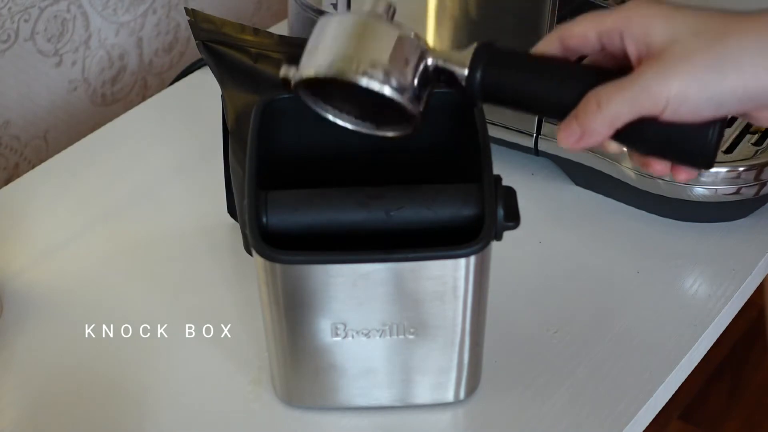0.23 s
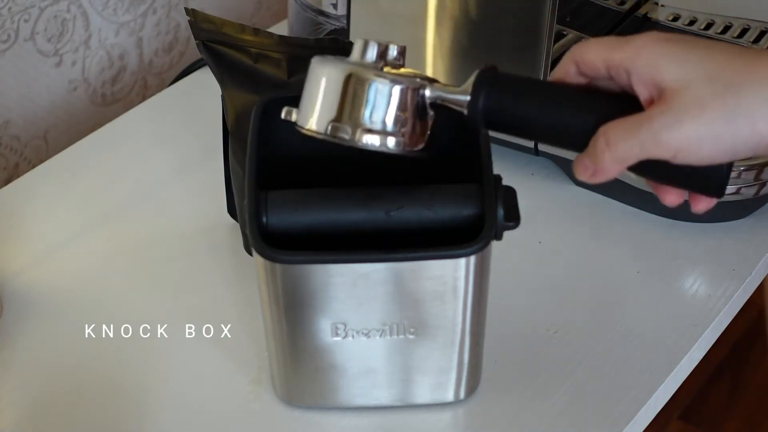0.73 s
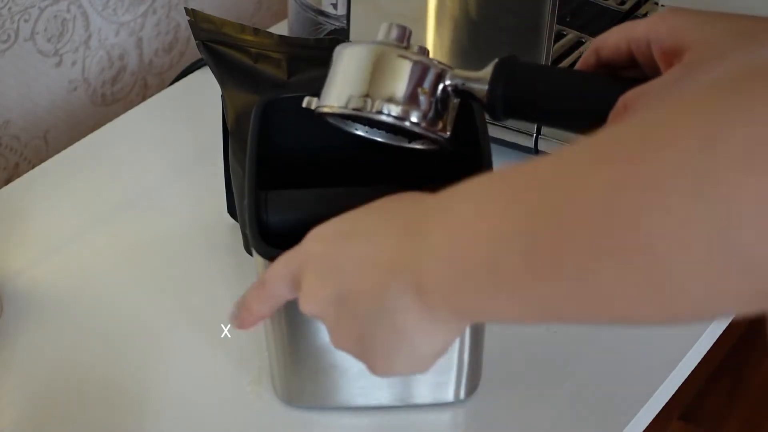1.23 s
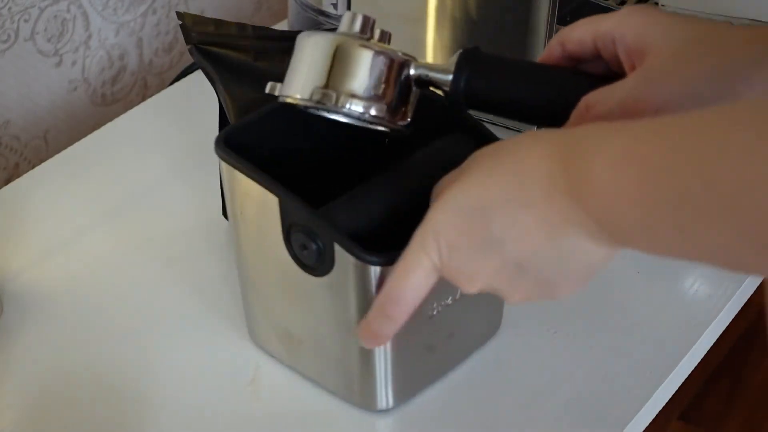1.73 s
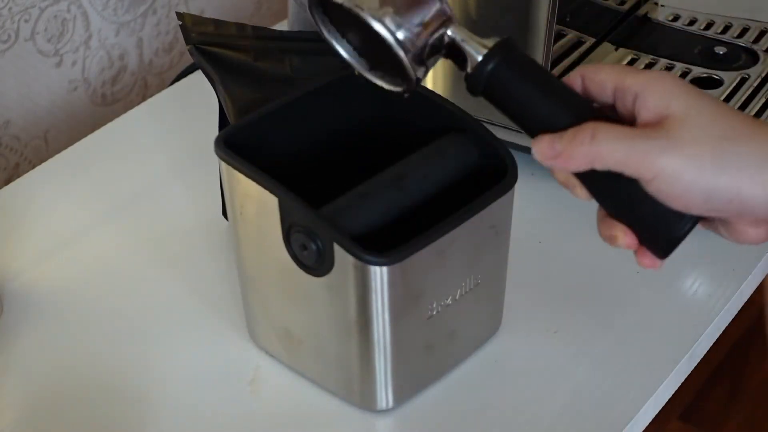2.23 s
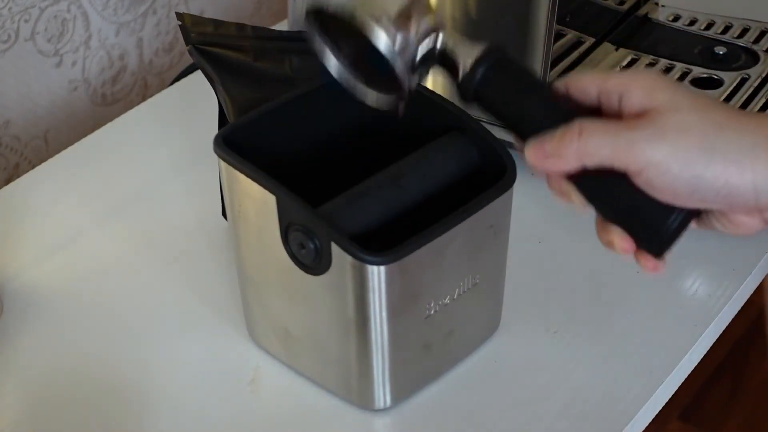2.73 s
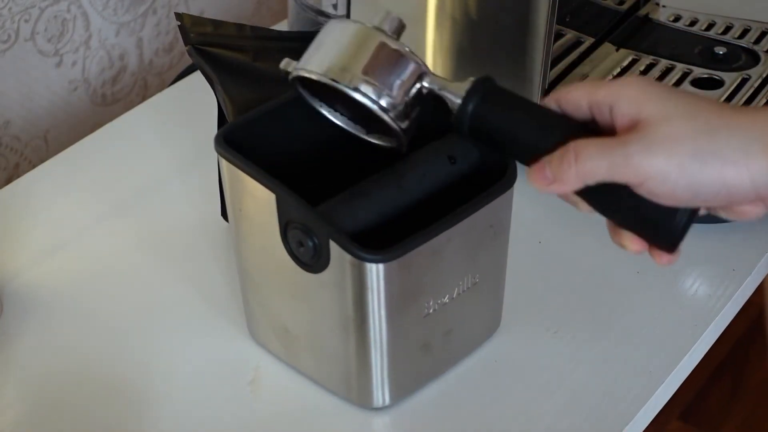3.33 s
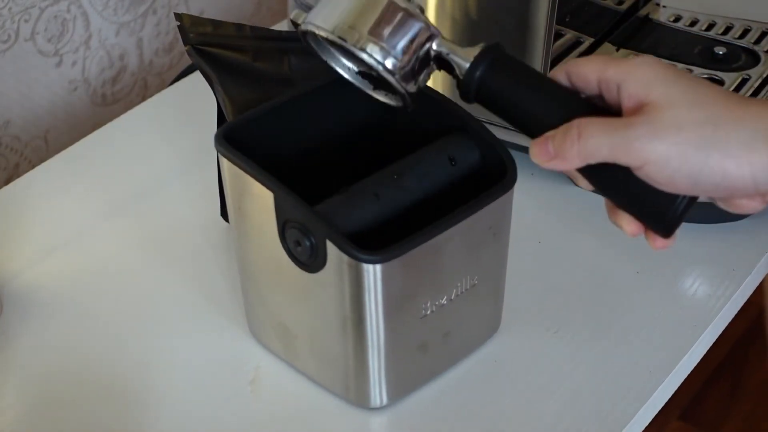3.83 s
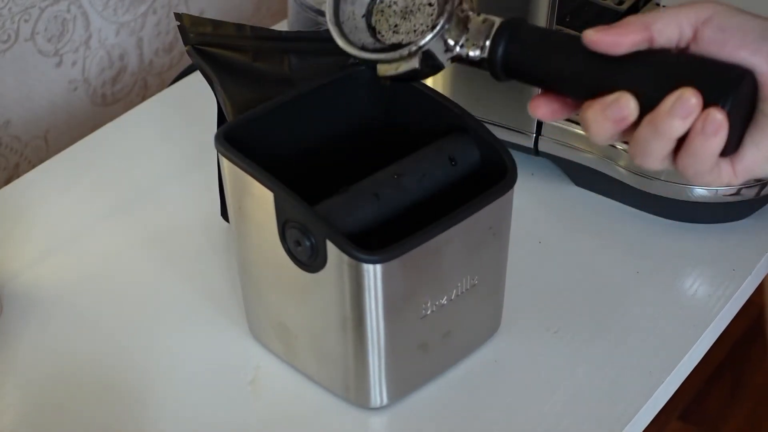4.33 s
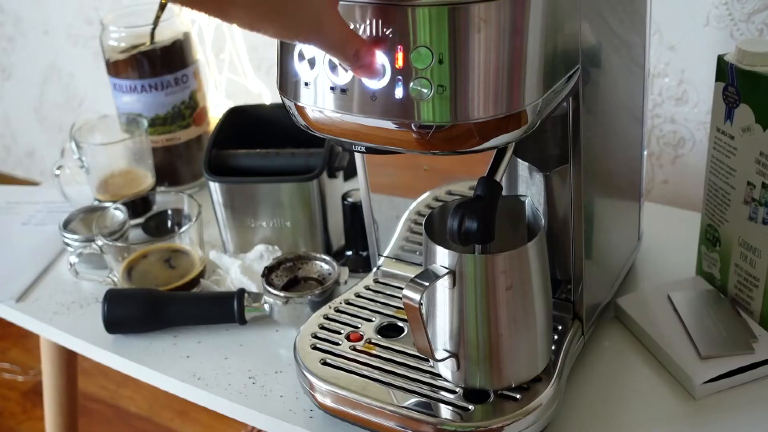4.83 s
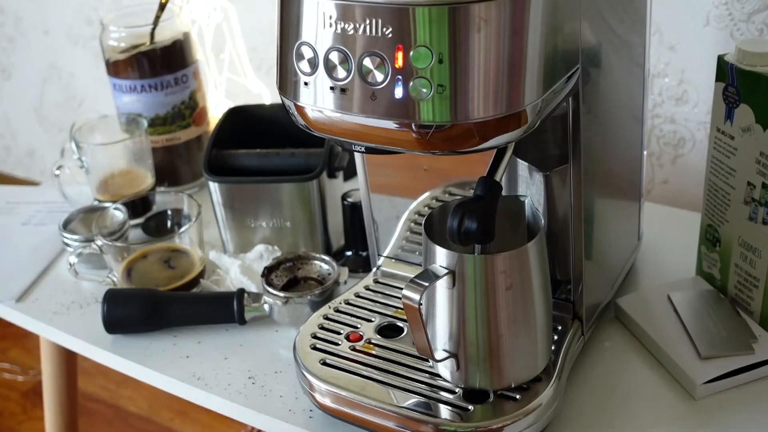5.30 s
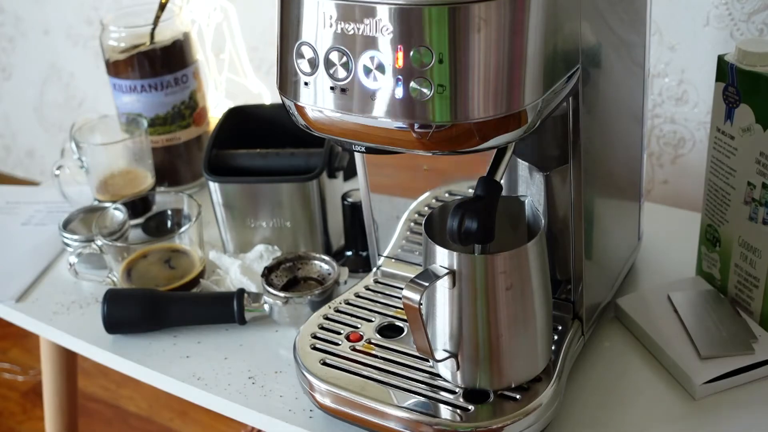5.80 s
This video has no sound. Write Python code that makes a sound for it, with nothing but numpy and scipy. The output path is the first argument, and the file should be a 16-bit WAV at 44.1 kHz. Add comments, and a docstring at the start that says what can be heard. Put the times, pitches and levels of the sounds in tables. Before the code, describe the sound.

A steel coffee handle taps a bin, bangs five times on its rubber bar, then a button clicks and steam starts hissing.

```python
"""A steel coffee handle is beaten five times on a knock box's rubber bar: thud, clank, basket rattle.
The last blow drops the grounds. Gain control squashes each blow, so the bare kitchen's echo swells behind.
Before the blows, the handle taps the hollow box and the box is turned on the counter.
After them, a button of the coffee machine clicks and its steam wand starts to hiss in a jug."""
import sys
import numpy as np
from scipy import signal
from scipy.fft import rfft, irfft
from scipy.io import wavfile
from scipy.ndimage import uniform_filter1d, minimum_filter1d

SR = 44100
rng = np.random.default_rng(int(sys.argv[2]) if len(sys.argv) > 2 else 0)


def to_wav(sig):
    """Store sig (one row per channel, or 1-D mono) as 16-bit WAV at the path in sys.argv[1].

    Samples outside -1..1 are clipped; the rate is SR.
    """
    pcm = np.clip(np.atleast_2d(sig), -1, 1) * 32767
    pcm = np.round(pcm).astype(np.int16)
    wavfile.write(sys.argv[1], SR, pcm.T)  # frames by channels


N = 267290
T = np.arange(N) / SR
EVENT_N = SR // 2
EVENT_T = T[:EVENT_N]


def amp(db):
    """Decibels to gain."""
    return 10 ** (np.asarray(db) / 20)

def unit(x):
    """Scale to rms 1."""
    return x / np.sqrt(np.mean(x ** 2) + 1e-20)

def curve(points, hz):
    """Interpolate a table over log frequency."""
    freq_hz, value = np.transpose(points)
    return np.interp(np.log(hz + 1), np.log(freq_hz), value)

def add(mix, start_s, sound):
    """Mix in a sound at start_s."""
    part = mix[round(start_s * SR):][:len(sound)]
    part += sound[:len(part)]

def colour(x, spectrum):
    """Apply a spectral shape; output rms 1."""
    hz = np.fft.rfftfreq(x.shape[-1], 1 / SR)
    return unit(irfft(rfft(x) * amp(curve(spectrum, hz)), x.shape[-1]))

def noise(spectrum):
    """Half a second of shaped noise, rms 1."""
    return colour(rng.standard_normal(EVENT_N), spectrum)

def wobble(length, smooth_samples):
    """Smoothed noise, rms 1."""
    return unit(uniform_filter1d(rng.standard_normal(length), size=smooth_samples))

def decay(t60_s):
    """Half a second of exponential decay."""
    return np.exp(-np.log(1000) * EVENT_T / max(t60_s, 1e-3))

def swell(peak_s, width_s):
    """Gaussian envelope."""
    return np.exp(-((EVENT_T - peak_s) / width_s) ** 2)

def low_cut(x, hz):
    """High-pass: removes rumble and bass below hz."""
    return signal.sosfilt(signal.butter(4, hz, "high", fs=SR, output="sos"), x)

def high_cut(x, hz):
    """One-pole low-pass."""
    return signal.sosfilt(signal.butter(1, hz, fs=SR, output="sos"), x)

def ring(modes, detune=0.):
    """Struck body: neighbouring modes swing in opposite senses; each contact detunes them."""
    shifts = 1 + detune * rng.standard_normal(len(modes))
    return sum((-1) ** k * amp(db) * decay(t60_s) * np.sin(2 * np.pi * hz * shifts[k] * EVENT_T)
               for k, (hz, db, t60_s) in enumerate(modes))

def strike(modes, crack, crack_db, crack_t60_s, detune=0.):
    """Strong modes ring; the many damped ones merge into a noisy crack."""
    return ring(modes, detune) + amp(crack_db) * decay(crack_t60_s) * noise(crack)

def stereo(mid, side, side_db):
    """Mid/side to left/right for two close microphones."""
    return mid + amp(side_db) * np.array([side, -side])


# room air before and after the background changes: freq_hz, gain_db
EARLY_AIR = [(15, -79), (25, -65), (92, -31.5), (200, -11), (405, -6), (503, -5), (560, -0.5), (840, -4),
             (1070, -0.5), (2610, -10.5), (3340, -17.5), (5280, -19.5), (7110, -24), (14400, -27.5),
             (16000, -29)]
LATE_AIR = [(15, -67), (25, -43.5), (102, -38.5), (242, -16), (503, -15), (714, -6), (887, -12),
            (962, -9.5), (1400, -13.5), (1840, -14.5), (2840, -20.5), (3160, -22), (4490, -26),
            (14800, -32.5), (16000, -31)]

def air(change_s=4.68):
    """Steady room rush; from change_s on, a quieter, differently coloured rush."""
    early = colour(rng.standard_normal((2, N)), EARLY_AIR)
    late = colour(rng.standard_normal((2, N)), LATE_AIR)
    drift = amp(1.04 * wobble(N, 4000))
    late_db = np.interp(T, [4.7, 4.95, 5.2], [-47, -46.5, -49.5])
    changed = np.clip((T - change_s) / 0.017, 0, 1)
    rush = np.sqrt(1 - changed) * amp(-44.5) * early + np.sqrt(changed) * amp(late_db) * late
    return stereo(*(drift * rush), side_db=-8)


# echo decay: freq_hz, t60_s
ROOM_DECAY = [(100, 0.7), (250, 0.66), (1000, 0.7256), (2500, 0.7757), (5000, 0.69), (9000, .5),
              (15000, 0.3458)]
# echo spectrum and side-channel shape (narrower in the bass): freq_hz, gain_db
ROOM_SPECTRUM = [(60, -83), (130, 4), (250, 5.5), (600, 4.5), (2000, 3.5), (6000, 3), (15000, 5.5)]
ROOM_SIDE = [(100, -11), (250, -5), (600, -2), (3000, -1), (9000, 1)]
# standing waves: pitch_hz, level_db, t60_s
STANDING_WAVES = [(141.4, -63, 0.86), (199, -61, 0.86), (259.8, -58, .6)]

def kitchen(x):
    """Dense reflections build up and die faster in the treble; standing waves boom on in the bass."""
    hz, t, bands = signal.stft(rng.standard_normal((2, SR)), SR, nperseg=256)
    bands *= np.exp(-np.log(1000) * t / curve(ROOM_DECAY, hz)[:, None])
    bands *= amp(curve(ROOM_SPECTRUM, hz))[:, None]
    bands[1] *= amp(curve(ROOM_SIDE, hz))[:, None]
    build_up = np.clip((T[:SR] - .003) / 0.0047, 0, 1)
    tail = signal.istft(bands, SR, nperseg=256)[1][:, :SR] * build_up
    tail /= np.linalg.norm(tail[0])
    for pitch_hz, db, t60_s in STANDING_WAVES:
        tail[0] += amp(db - 60 * T[:SR] / t60_s) * np.sin(2 * np.pi * pitch_hz * T[:SR])
    mid, side = signal.oaconvolve(x[None], tail, axes=1)[:, :N]
    return stereo(mid, side, side_db=-11)

def echo(directions):
    """A struck body sounds slightly different in each direction; the room returns them all."""
    out = np.zeros((2, N))
    for _ in range(directions):
        radiated = (amp(-2.5) * knocks() + amp(-6.5) * puck() + amp(-8) * tap()
                    + amp(-5) * box_turn() + amp(-9) * high_cut(button(), hz=6000))
        out += kitchen(radiated)
    return out / np.sqrt(directions)


# finger contacts: start_s, level_db
FINGER_TICKS = [(1.128, -46), (1.565, -51), (1.852, -48), (4.97, -41)]

def finger_ticks():
    """Faint bright snaps of fingers on handle, box and button."""
    out = np.zeros(N)
    for start_s, db in FINGER_TICKS:
        add(out, start_s, amp(db) * decay(.03) * rng.standard_normal(EVENT_N))
    return low_cut(out, hz=900)


# steam hiss at first flow and full flow: freq_hz, gain_db
EARLY_HISS = [(35, -85), (60, -55), (100, -51), (139, -26), (363, -14.5), (408, -27), (503, -5.5),
              (636, -10.5), (767, -4.5), (924, -10.5), (3670, -10), (14200, -14.5), (16000, -16.5)]
FULL_HISS = [(35, -70), (60, -40), (133, -44), (202, -14), (346, -35), (408, -16), (503, -9), (651, -11),
             (785, -8.5), (1410, -6.5), (1510, -3), (8920, -8.5), (16000, -12.5)]

def steam(start_s=5.597, open_s=0.082, full_s=5.978, fill_s=0.2, build_db_per_s=25):
    """Spluttering hiss: the valve opens, the flow builds, the jug's midrange fills in."""
    opening = np.clip((T - start_s) / open_s, 0, 1)
    flow_db = -31 - build_db_per_s * np.maximum(full_s - T, 0)
    splutter = amp(0.47 * wobble(N, 200))
    jet = rng.standard_normal((2, N)) * splutter
    fill = np.clip(1 - (full_s - T) / fill_s, 0, 1)
    hiss = (1 - fill) * colour(jet, EARLY_HISS) + fill * colour(jet, FULL_HISS)
    return stereo(*hiss, side_db=-11.5) * amp(flow_db) * opening

def valve():
    """Faint sigh and thin whistle just ahead of the steam."""
    out = np.zeros(N)
    add(out, 5.36, amp(-55.5) * swell(peak_s=.1, width_s=.041) * noise(FULL_HISS))
    waver = 1 + .002 * wobble(EVENT_N, 300)
    whistle = sum(amp(db) * np.sin(2 * np.pi * np.cumsum(hz * waver) / SR)
                  for hz, db in [(9749, -60), (13205, -56)])
    add(out, 5.435, whistle * swell(peak_s=.1, width_s=.025))
    return out


# button and latch modes: pitch_hz, level_db, t60_s
BUTTON_MODES = [(910, -10, 0.042), (2140, -3.5, 0.025), (3120, -3.5, 0.011)]
LATCH_MODES = [(900, -7, 0.039), (2060, -9, .013), (2860, -11, 0.014), (4350, -16, 0.004),
               (9200, 4.5, 0.006)]
# click and slide noise: freq_hz, gain_db
SNAP_SPECTRUM = [(120, -35), (400, 4), (850, 5), (1400, 3.5), (2400, 8.5), (4000, 2), (7000, -6),
                 (10000, -10), (12000, -33), (16000, -21)]

def button(press_s=4.7413, release_s=4.8755, peak_s=4.9, swell_db_per_s=850, fade_db_per_s=1300):
    """One click going in; springing back, a rasp of slips that quicken, swell and fade."""
    out = np.zeros(N)
    click = strike(BUTTON_MODES, SNAP_SPECTRUM, crack_db=-9, crack_t60_s=0.029, detune=.015)
    add(out, press_s, amp(-16.5) * click)
    gaps_s = .0068 * .86 ** np.arange(10)
    for slip_s in release_s + np.cumsum(gaps_s) - gaps_s:
        db = -23 - max(swell_db_per_s * (peak_s - slip_s), fade_db_per_s * (slip_s - peak_s))
        slip = strike(LATCH_MODES, SNAP_SPECTRUM, crack_db=-1, crack_t60_s=0.05, detune=0.042)
        add(out, slip_s, amp(db) * slip)
    return low_cut(out, hz=450)


# feet landing on the counter: start_s, level_db
FOOT_BUMPS = [(1.6372, -13), (1.640, -11.5), (1.6425, -9.5), (1.6502, -19)]
# box modes, struck at a foot: pitch_hz, level_db, t60_s
FOOT_MODES = [(176, -9, 0.03), (269, -7.5, 0.038), (492, -10.5, 0.039), (670, -7.5, 0.026),
              (767, -11.5, 0.053), (1390, -14, 0.0081), (2440, -5, 0.014), (4700, -24, 0.0047)]
# impact noise of feet, grounds, bar and head: freq_hz, gain_db
CRACK_SPECTRUM = [(60, -41), (200, -21), (600, -3), (1200, 3), (2400, 1), (3500, -5.5), (5500, -10),
                  (8000, -19), (16000, -29)]

def box_turn():
    """The box is turned: it slides a little and bumps down."""
    out = np.zeros(N)
    slide = amp(-46.5) * swell(peak_s=.125, width_s=.072) * noise(SNAP_SPECTRUM)
    add(out, 1.5, slide)
    for start_s, db in FOOT_BUMPS:
        bump = strike(FOOT_MODES, CRACK_SPECTRUM, crack_db=-7, crack_t60_s=0.044, detune=0.065)
        add(out, start_s, amp(db) * bump * (1 - decay(0.0032)))
    return low_cut(out, hz=136)


# box modes, tapped: pitch_hz, level_db, t60_s
TAP_MODES = [(570, -14.5, 0.033), (677, -10, 0.065), (694, -26.5, 0.14), (1370, -10.5, 0.005),
             (2000, -12, 0.021), (2280, -11, 0.011), (2910, -14.5, 0.016), (4000, -18, 0.013)]
# tap noise: freq_hz, gain_db
TAP_SPECTRUM = [(40, -34), (150, -7), (380, -21), (620, 1), (950, -2), (1500, 7), (2400, 1.5), (4200, -9),
                (6000, -13), (9000, -29), (16000, -47)]

def tap(start_s=.2937, contact_s=0.0043):
    """The handle touches the hollow box; the basket shivers faintly."""
    out = np.zeros(N)
    body = amp(0.5) * low_cut(ring(TAP_MODES), hz=324)
    crack = amp(-13.5) * decay(0.04) * noise(TAP_SPECTRUM)
    treble = low_cut(rng.standard_normal(EVENT_N), hz=4000)
    shiver = amp(-40) * decay(0.095) * (1 - decay(0.026)) * treble
    add(out, start_s, (body + crack + shiver) * (1 - decay(contact_s)))
    return low_cut(out, hz=103)


# steel basket and rim modes: pitch_hz, level_db, t60_s
BASKET_MODES = [(1010, -13, .2), (1254, -15, .2), (1652, -16, .2), (1919, -15, .22), (2330, -18, .2),
                (2975, -18, .22), (4710, -21, .22), (5728, -22, .22), (6724, -18, .22), (7009, -15, .24),
                (8543, -16, .32), (8705, -17, .28), (10620, -18, .25), (11359, -18, .28), (11810, -18, .24),
                (12650, -20, .28), (13135, -15, .26), (13565, -16, .26), (13620, -15, .26),
                (13905, -14, .3), (15068, -18, .22)]
RIM_MODES = [(11795, -5, .13), (11835, -9, .08)]
# basket chatter: freq_hz, gain_db
CHATTER_SPECTRUM = [(60, -22), (150, -30), (300, 3), (500, -5), (1000, 8.5), (2000, -3.5), (3500, -1),
                    (6000, 4), (8000, 1), (10000, -1), (13000, -0.5), (16000, -5)]

def rattle(t60_s, rim_db, impacts_per_s=14000, rise_s=0.0047):
    """A shower of tiny impacts rings the basket and its rim; longer chatter builds a stronger ring."""
    impacts = rng.standard_normal(EVENT_N) * (rng.random(EVENT_N) < impacts_per_s / SR)
    chatter = colour(impacts, CHATTER_SPECTRUM) * decay(t60_s)
    steel = amp(-4) * min(t60_s / 0.14, 1) * ring(BASKET_MODES, detune=0.00089)
    flutter = 1 + 0.48 * wobble(EVENT_N, 250)
    rim = amp(rim_db) * flutter * ring(RIM_MODES)
    return (chatter + steel + rim) * (1 - decay(rise_s))


# dull thud of the grounds landing, with the room's low hum after it: pitch_hz, level_db, t60_s
DROP_AND_HUM = [(196.9, -30.5, 0.53), (314, -16.5, 0.038), (454, -7.5, 0.031), (660, -4.5, 0.021),
                (950, -8, 0.011), (1310, -13, 0.011)]

def puck(bounce_s=3.579, drop_s=3.585, spring_back_s=3.592):
    """Last blow: the head bounces, the cake of grounds drops, the emptied basket springs back."""
    out = np.zeros(N)
    bounce = strike(HEAD_MODES, CRACK_SPECTRUM, crack_db=-9.5, crack_t60_s=0.055, detune=0.044)
    add(out, bounce_s, amp(-5.5) * low_cut(bounce, hz=169))
    add(out, drop_s, amp(-6.5) * strike(DROP_AND_HUM, CRACK_SPECTRUM, crack_db=-5, crack_t60_s=0.054))
    add(out, spring_back_s, amp(-6) * rattle(t60_s=0.029, rim_db=-13))
    return low_cut(out, hz=141)


# rubber bar thud, with the room's low boom ringing on: pitch_hz, level_db, t60_s
THUD_AND_BOOM = [(112, -31, 0.041), (141.3, -33.5, 0.42), (189.1, -9, 0.016), (261.3, -8, 0.042),
                 (262.3, -25, 0.44), (330, -16, 0.032), (472, -17.5, 0.07), (656, -14.5, 0.051),
                 (1340, -19, 0.0053), (2390, -31, 0.0088)]
# handle head modes: pitch_hz, level_db, t60_s
HEAD_MODES = [(684, -18, 0.078), (960, -14, 0.0075), (1320, -11, 0.021), (1740, -7.5, 0.012),
              (1947, -4.5, 0.02), (2440, -4, 0.0076), (3140, -8.5, 0.0079)]
# blows on the bar: start_s, clank_db, squeeze_s, thud_re_clank_db, rattle_t60_s, rim_db
BLOWS = [(2.5122, 6.5, 0.0011, -14.5, 0.2, 5), (2.785, 4.5, .008, -7.5, 0.22, -6),
         (3.0551, 5, .0075, -7.5, 0.17, -29), (3.3039, 4.5, .0074, -8.5, 0.16, -32),
         (3.561, -4.5, .0056, -5, 0.039, -31)]

def knocks(rattle_lag_s=.0063, rattle_re_clank_db=-11):
    """The rubber thuds and bottoms out, the head clanks, then the basket chatters in its holder."""
    out = np.zeros(N)
    for start_s, clank_db, squeeze_s, thud_re_clank_db, rattle_t60_s, rim_db in BLOWS:
        thud = strike(THUD_AND_BOOM, CRACK_SPECTRUM, crack_db=-11, crack_t60_s=0.043, detune=0.0098)
        add(out, start_s, amp(clank_db + thud_re_clank_db) * thud)
        clank = strike(HEAD_MODES, CRACK_SPECTRUM, crack_db=-6.5, crack_t60_s=0.037, detune=0.054)
        add(out, start_s + squeeze_s, amp(clank_db) * low_cut(clank, hz=169))
        spread = np.sqrt(min(0.13 / rattle_t60_s, 1))  # long chatter spreads its energy thinner
        basket = spread * rattle(rattle_t60_s, rim_db)
        add(out, start_s + squeeze_s + rattle_lag_s, amp(clank_db + rattle_re_clank_db) * basket)
    return low_cut(out, hz=71)


def scene():
    """Direct sounds just left of centre, their echo, steam and room air."""
    direct = knocks() + puck() + tap() + box_turn() + button() + finger_ticks()
    panned = direct * amp([[.4], [-.4]])
    return panned + echo(directions=2) + steam() + valve() + air() * amp([[.8], [-.8]])

def gain_control(x, level_db, ceiling_db, recovery_db_per_s):
    """Gain drops as the level passes the ceiling, then climbs back steadily."""
    climb_db = T * recovery_db_per_s
    excess_db = np.maximum(level_db - ceiling_db, 0)
    gain_db = climb_db - np.maximum.accumulate(excess_db + climb_db)
    return x * amp(uniform_filter1d(minimum_filter1d(gain_db, size=17), size=17))

def record(dry, average_s=0.011, band_edge_hz=15950):
    """Slow gain control levels the blows, a fast limiter catches peaks, a steep low-pass ends the band."""
    pole = np.exp(-1 / (average_s * SR))
    power = signal.lfilter([1 - pole], [1, -pole], (dry ** 2).mean(0))
    power_db = 10 * np.log10(power + 1e-12)
    levelled = gain_control(dry, power_db, ceiling_db=-15, recovery_db_per_s=152)
    peak_db = 20 * np.log10(abs(levelled).max(0) + 1e-9)
    limited = gain_control(levelled, peak_db, ceiling_db=-4, recovery_db_per_s=2500)
    low_pass = signal.firwin(511, band_edge_hz, window=("kaiser", 9), fs=SR)
    return signal.oaconvolve(limited, low_pass[None], "same")


dry = scene()
out = record(dry)
to_wav(out)
```